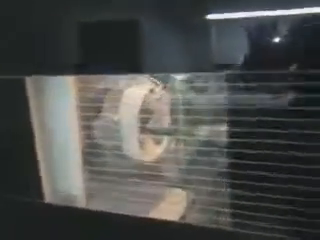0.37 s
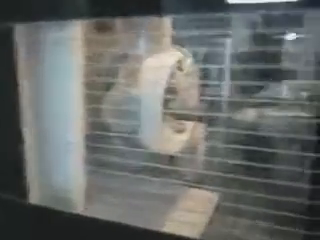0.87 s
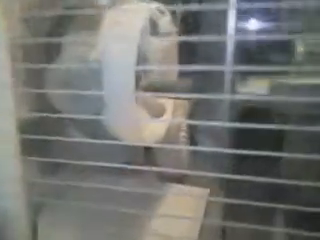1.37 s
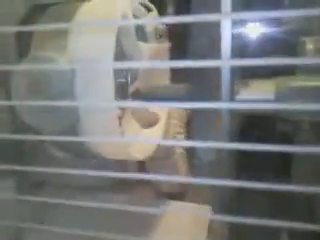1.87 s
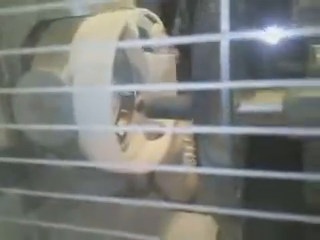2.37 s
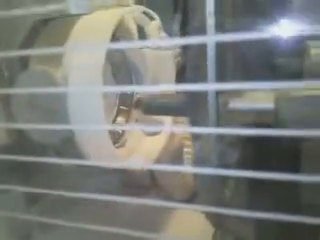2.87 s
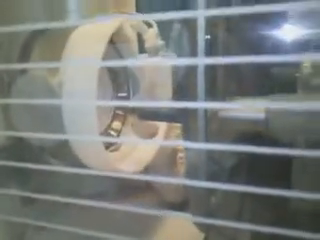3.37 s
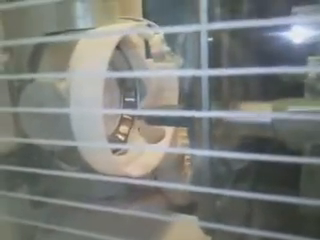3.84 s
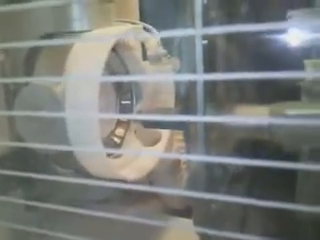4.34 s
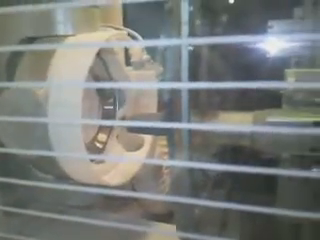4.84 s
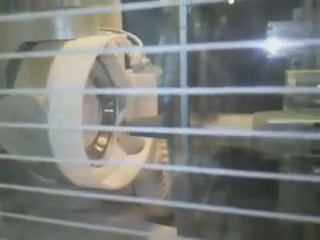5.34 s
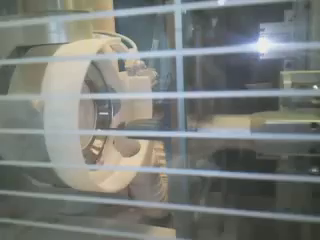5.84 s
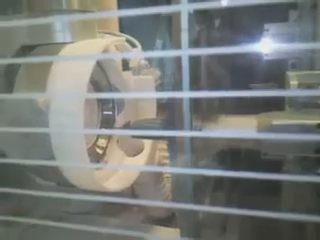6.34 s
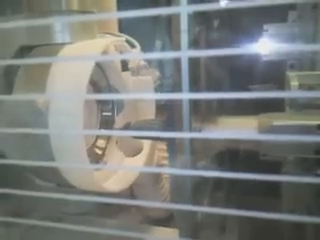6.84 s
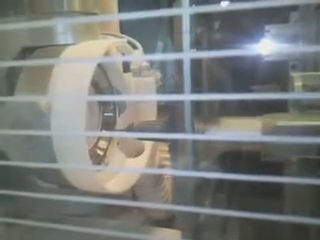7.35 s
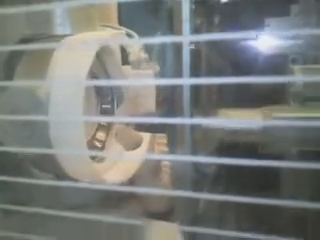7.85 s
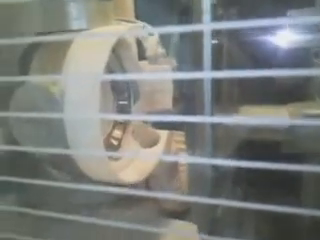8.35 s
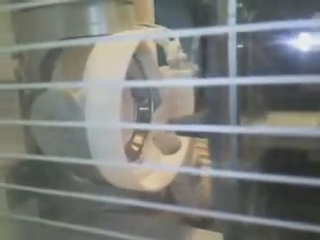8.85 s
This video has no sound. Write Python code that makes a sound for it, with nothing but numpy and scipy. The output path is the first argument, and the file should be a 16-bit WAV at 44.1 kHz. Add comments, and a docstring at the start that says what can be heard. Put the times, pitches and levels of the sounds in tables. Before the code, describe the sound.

A milling machine hums steadily in a hard-walled workshop; eight sharp knocks on a panel crack and echo early on, then the hum continues.

```python
"""A small milling machine idles behind its window in a hard-walled workshop, heard at one microphone. At first
its air hiss is strongest and brief whines pass; the motor lines, swelling once a second, step up as the
microphone nears the window. The second motor then gains effort and an axis drive sings in spells. From 2.2 to
3.5 s eight knocks on a panel across the room crack, echo off the walls and ring, the strongest overloading the
input; afterwards the machine idles on, with two more whines and drive spells."""
import sys
import numpy as np
from scipy import signal
from scipy.fft import rfft, irfft, next_fast_len
from scipy.io import wavfile
from scipy.ndimage import uniform_filter1d, map_coordinates

SR = 44100
rng = np.random.default_rng(int(sys.argv[2]) if len(sys.argv) > 2 else 0)


def put_to_file(sound):
    """Save the sound as 16-bit audio at rate SR, in the file named by the first command-line argument."""
    columns = np.atleast_2d(sound).T  # one column per channel
    safe = np.clip(columns, -1, 1)
    whole_steps = np.round(safe * 32767)
    wavfile.write(sys.argv[1], SR, whole_steps.astype(np.int16))


def rack_gain(trim_db):
    """Turn a fader trim in dB into the linear factor to multiply a signal by."""
    fader = np.asarray(trim_db, float)
    return 10 ** (fader / 20)


N = 395136
T = np.arange(N) / SR

# hiss of air and bearings, spectral shape: f/Hz, relative density/dB per Hz
HISS_SHAPE = [(760, -40), (1300, -8.5), (1490, -9), (1620, -2.5), (1770, -6), (1930, -0.5), (2190, -4),
              (2310, -0.5), (2500, -4.5), (2700, -7), (2980, -10.5), (3870, -32), (5030, -60.5),
              (8510, -120)]
# rumble of the machine housing, spectral shape: f/Hz, relative density/dB per Hz
HOUSING_SHAPE = [(15, -54.5), (30, -44), (60, -23.5), (146, -21.5), (200, -16.5), (290, -13), (380, -15.5),
                 (450, -18), (620, -17), (730, -22.5), (900, -17.5), (1080, -23), (1500, -31.5),
                 (2000, -44), (3300, -120)]
HISS_DB, HOUSING_DB = -60.5, -58  # rms before the slow breathing and the opening lift
OPEN_AIR_DB, OPEN_AIR_S = 1, .9  # opening lift of the hiss and its time constant

# brief whines: start t/s, length/s, f/Hz, rms level before fades and flutter/dB
WHINE_NOTES = [(0.132, 0.38, 534, -60.5), (0.253, 0.13, 2280, -64), (0.5, 0.27, 1330, -70),
               (.95, 0.13, 1230, -69), (5.62, 0.36, 2680, -70), (5.3, 0.27, 1690, -70.5)]

# spells of the axis drive: start t/s, length/s, level of its upper line before flutter/dB
DRIVE_SPELLS = [(1.256, .8, -66), (5.34, 2.4, -64.5), (8.0, 1.3, -65.5)]
DRIVE_HZ, DRIVE_FADE_S, DRIVE_IDLE_DB = 557.09, 0.056, -71.5

# main motor line (rms before the position gain, swell and flutter), second motor, and their slow rates
MAIN_HZ, MAIN_DB, PUMP_HZ, SWELL_HZ, THROB_HZ = 332.47, -49.5, 299.11, .995, 1.42
# weaker lines of other shafts: f/Hz, rms level before position gain and flutter/dB, phase wander/rad
SHAFT_LINES = [(204.8, -62.5, .1), (364, -72.5, 0.52), (364.5, -72, 1.5), (387, -68.5, .1),
               (411, -73.5, .1), (655, -73, .6), (790, -74.5, .1), (997, -78.5, .5), (1017, -76.5, .5)]
# harmonics 1, 2, 3 of the second motor: level at full effort before throb/dB, loss at no effort/dB
PUMP_HARMONICS = [(-54.5, 8.5), (-61, 4.5), (-65.5, 13)]
# effort of the second motor: t/s, effort/0-1
PUMP_EFFORT = [(0, 0), (1.3, 0.07), (1.5, 0.6), (4, 0.72), (8.96, 0.85)]
# microphone moving up to the window: t/s, gain of the main motor line/dB
WINDOW_APPROACH = [(0, -4.5), (.67, -6), (.9, 0.5), (2.1, -2.5), (4, 0), (8.96, .5)]

# knocks: t/s, peak level ahead of the input/dB, pitch of the spot struck f/Hz,
# treble slope/dB per octave, tail level re echo peak, before the tail's fades/dB
KNOCK_BLOWS = [(2.182, -6.5, 766, -1, -13), (2.381, -10, 870, -6, -13), (2.606, -3.5, 790, 0.5, -13),
               (2.818, -2, 778, -1.5, -13.5), (3.007, -2.5, 1150, 3.5, -12.5), (3.177, -4, 1220, -3, -14),
               (3.341, -10, 1500, -7, -14.5), (3.488, -3.5, 1280, 4.5, -10)]
# colour common to the knocks: f/Hz, relative density/dB per Hz
BLOW_COLOUR = [(18, -60.5), (30, -41.5), (70, -24.5), (141, -26), (299, -18.5), (422, -10), (572, -3.5),
               (621, -7), (776, 0.5), (1070, -2.5), (1260, -3.5), (1790, -9.5), (2420, -11), (3870, -36),
               (5030, -73.5), (8510, -120)]
# short notes of the blow itself: f/Hz, sine amplitude re crack noise rms/dB
THUD_NOTES = [(790, -11), (1235, -5), (2000, -11)]
# panel and room modes: f/Hz, relative level before knock colour and random spread/dB, t60/s
PANEL_MODES = [(425, -14, .4), (472, -13, .4), (575, -9, .45), (669, -12, .4), (710, -7, .45),
               (770, -3, .45), (830, -6, .4), (872, -4, .45), (1003, -4, .4), (1060, -9, .45),
               (1095, -9, .5), (1153, -3, .45), (1215, -5, .45), (1243, -3, .48), (1298, -5, .55),
               (1370, -10, .6), (1447, -8, .55), (1501, -8, .55), (1539, -9, .5), (1645, -9, .5),
               (1720, -13, .45), (1915, -13, .35), (2013, -16, .45), (2390, -12, .3), (2471, -18, .4)]
# paths to the microphone, a weak one through the air and then the walls: delay/s, relative level/dB
WALL_PATHS = [(.001, -18), (.006, -2), (.012, 1), (.026, -14), (0.04, -13.5), (.051, -15.5), (.063, -5.5),
              (.075, -14), (.091, -11.5), (.103, -10)]
# decay of the diffuse room tail: f/Hz, t60/s
ROOM_DECAY = [(150, 0.7), (500, 0.38), (850, 0.6), (1150, 0.73), (1400, 0.83), (1750, 0.66), (2600, 0.47),
              (4000, .36)]
SPOT_DB, SPOT_OCTAVES, BASS_DB = 2, 0.15, -1.1  # lift and width around the pitch struck; bass slope per octave
CLUMP_DB = 2  # unevenness of the diffuse tail


def unit(x):
    """Scaled to rms 1."""
    return x / np.sqrt(np.mean(x ** 2) + 1e-20)


def along(points, hz):
    """Reads (f/Hz, value) points on a log frequency axis."""
    f, v = np.transpose(points)
    return np.interp(np.log(hz + 1), np.log(f + 1), v)


def over_time(points):
    """Joins (t/s, value) points into one value per sample."""
    s, v = np.transpose(points)
    return np.interp(T, s, v)


def wobble(rate):
    """A smooth random curve through rate knots a second."""
    knots = rng.standard_normal(int(N * rate / SR) + 4)
    return map_coordinates(knots, [T * rate])


def filtered(x, response):
    """Multiplies the spectrum of x by a response of frequency."""
    m = next_fast_len(len(x) + 8192)
    return irfft(rfft(x, m) * response(np.fft.rfftfreq(m, 1 / SR)), m)[:len(x)]


def rush(spectrum, patchy_db):
    """Noise of rms 1, shaped by spectrum, with patches of random gain in time and frequency."""
    z = signal.stft(rng.standard_normal(N), nperseg=1024)[2]
    field = uniform_filter1d(rng.standard_normal(z.shape), 4, 0)
    patches = unit(uniform_filter1d(field, 5, 1))
    noise = signal.istft(z * rack_gain(patchy_db * patches), nperseg=1024)[1][:N]
    return unit(filtered(noise, lambda hz: rack_gain(along(spectrum, hz))))


def tone(hz, db, wander, flutter_db=5.0):
    """A sine about the given rms level, its phase and level wandering at random."""
    phase = 2 * np.pi * (hz * T + rng.random()) + wander * wobble(2.1)
    return np.sqrt(2) * rack_gain(db + flutter_db * wobble(15)) * np.sin(phase)


def air():
    """Hiss of air and bearings over the rumble of the housing; both breathe together, slowly."""
    breath = wobble(1.1)
    opening_db = OPEN_AIR_DB * np.exp(-T / OPEN_AIR_S)
    hiss_db = HISS_DB + opening_db + 0.93 * breath + 0.36 * wobble(4)
    housing_db = HOUSING_DB + 0.65 * breath + 0.63 * wobble(14)
    hiss = rack_gain(hiss_db) * rush(HISS_SHAPE, patchy_db=3.0)
    housing = rack_gain(housing_db) * rush(HOUSING_SHAPE, patchy_db=2.5)
    return hiss + housing


def whines():
    """Short unsteady tones that fade in and out."""
    out = np.zeros(N)
    for start, length, hz, db in WHINE_NOTES:
        fade = np.sin(np.pi * np.clip((T - start) / length, 0, 1)) ** 0.47
        out += fade * tone(hz, db, 0.49)
    return out


def drive():
    """The axis drive sings two lines that rise from idle while it runs."""
    fade = lambda seconds: np.clip(seconds / DRIVE_FADE_S, 0, 1)
    level_db = np.full(N, DRIVE_IDLE_DB)
    for start, length, db in DRIVE_SPELLS:
        running = fade(T - start) * fade(start + length - T)
        level_db += (db - DRIVE_IDLE_DB) * running
    upper = tone(DRIVE_HZ, level_db, .4, flutter_db=2.2)
    lower = tone(490, level_db - 6.5, 1.6, flutter_db=5.5)
    return upper + lower


def main_motor(near_db):
    """The main line swells once a second as the load comes round, which also drags its phase."""
    load = np.exp(2.4 * (np.cos(2 * np.pi * SWELL_HZ * (T - 5.79)) - 1))
    bend = 0.33 * np.sin(2 * np.pi * SWELL_HZ * (T - 5.7))
    level_db = MAIN_DB + near_db + 3.64 * load + 0.65 * wobble(17)
    return np.sqrt(2) * rack_gain(level_db) * np.sin(2 * np.pi * MAIN_HZ * T + bend)


def second_motor():
    """Three harmonics strengthen with effort and beat with the motor's slip."""
    effort = over_time(PUMP_EFFORT)
    throb_db = 1.5 * np.cos(2 * np.pi * THROB_HZ * (T - 6.68))
    out = np.zeros(N)
    for k, (db, lost_db) in enumerate(PUMP_HARMONICS, start=1):
        level_db = db - lost_db * (1 - effort) + throb_db / k
        out += tone(k * PUMP_HZ, level_db, 0.28 * k, flutter_db=1.0)
    return out


def motors():
    """Main motor, second motor and the lines of other shafts, as the microphone moves up to the window."""
    near_db = over_time(WINDOW_APPROACH)
    # the other shafts gain less from the approach, the second motor nothing
    shafts = sum(tone(hz, db + 0.27 * near_db, wander, flutter_db=2.5) for hz, db, wander in SHAFT_LINES)
    return main_motor(near_db) + second_motor() + shafts


def reverb(t):
    """A diffuse, clumpy tail: each frequency dies at its own speed."""
    hz, frame_s, z = signal.stft(rng.standard_normal(len(t)), SR, nperseg=256)
    clumps = unit(uniform_filter1d(rng.standard_normal(z.shape), size=5, axis=1))
    decay_db = -60 * frame_s / along(ROOM_DECAY, hz)[:, None]
    return signal.istft(z * rack_gain(CLUMP_DB * clumps + decay_db), SR, nperseg=256)[1][:len(t)]


def knocks():
    """Each blow is a short crack and thud repeated by the same walls, a set of ringing modes and a diffuse tail."""
    out, t = np.zeros(N + SR), np.arange(int(.8 * SR)) / SR
    rise = lambda seconds, wait=0: 1 - np.exp(-np.clip(t - wait, 0, None) / seconds)
    early = lambda x: x / np.sqrt(np.mean(x[:SR // 8] ** 2))  # rms 1 over the first eighth of a second
    note = lambda hz: np.sin(2 * np.pi * (hz * t + rng.random()))
    walls = np.zeros(len(t))
    for delay, db in WALL_PATHS:
        walls[round(delay * SR)] = rack_gain(db)
    for s, db, spot_hz, treble_db, tail_db in KNOCK_BLOWS:
        spot = lambda hz: SPOT_DB * np.exp(-.5 * (np.log2((hz + 1) / spot_hz) / SPOT_OCTAVES) ** 2)
        slope = lambda hz: np.where(hz > 1200, treble_db, BASS_DB) * np.log2((hz + 50) / 1250) + spot(hz)
        colour = lambda hz: rack_gain(along(BLOW_COLOUR, hz) + slope(hz))

        thud = sum(rack_gain(level) * note(hz) for hz, level in THUD_NOTES)
        crack = rise(0.00063) * rack_gain(-60 * t / 0.032) * (rng.standard_normal(len(t)) + thud)
        echoes = filtered(signal.fftconvolve(crack, walls)[:len(t)], colour)

        ring = np.zeros(len(t))
        for hz, level, t60 in PANEL_MODES:
            mode_db = level + rng.normal(0, 3.1) + slope(hz) - 60 * t / t60
            ring += rack_gain(mode_db) * note(hz)
        diffuse = filtered(reverb(t), colour)
        tail = rise(0.0065, 0.0061) * early(early(diffuse) + rack_gain(-4) * early(ring))
        tail = tail * rack_gain(-12 * (t / 0.39) ** 7)  # the tail drops away faster at its end

        sound = echoes / np.abs(echoes).max() + rack_gain(tail_db) * tail
        first = round((s - .008) * SR)  # the blow starts just ahead of its listed time
        out[first:][:len(t)] += rack_gain(db) * sound / np.abs(sound).max()
    return out[:N]


def scene():
    """Machine and knocks at one microphone."""
    return (air() + whines() + drive() + motors() + knocks())[None]


def top_cut(x):
    """Nothing passes above the cut-off."""
    return signal.sosfilt(signal.butter(12, 16000, fs=SR, output="sos"), x)


def record(dry):
    """Little passes above 4.5 kHz; after that the converter cuts the highest peaks flat."""
    narrow = filtered(dry[0], lambda hz: 1 / (1 + (hz / 4450) ** 40))[None]
    clipped = np.clip(narrow, -.705, .705)
    return top_cut(clipped)


dry = scene()
out = record(dry)
put_to_file(out)
```